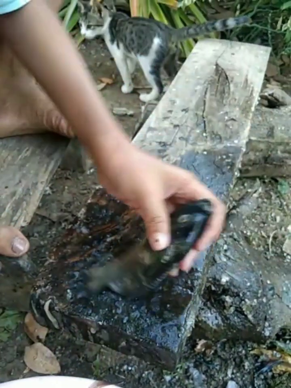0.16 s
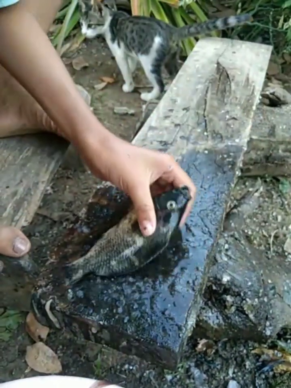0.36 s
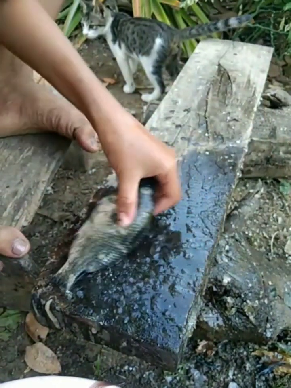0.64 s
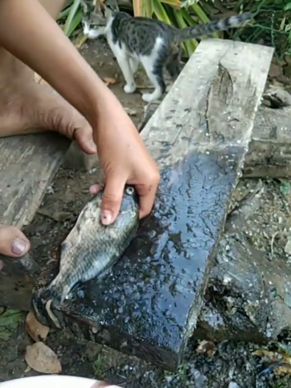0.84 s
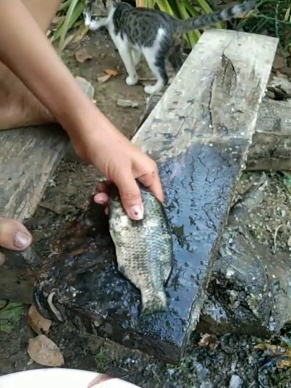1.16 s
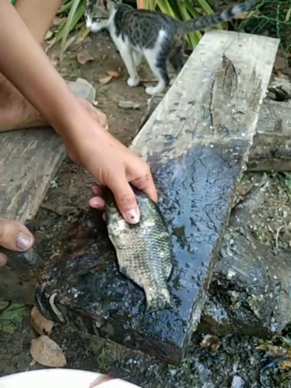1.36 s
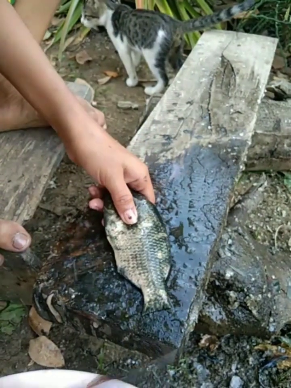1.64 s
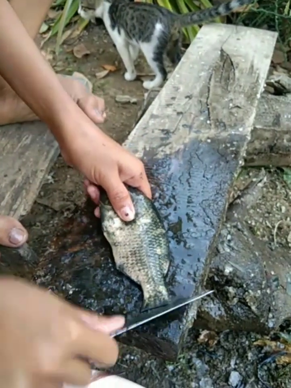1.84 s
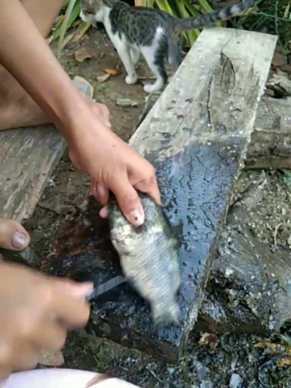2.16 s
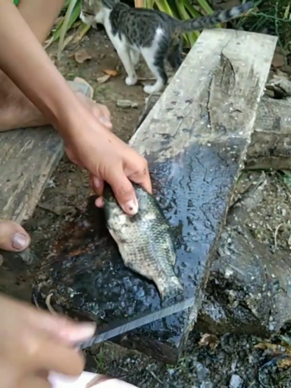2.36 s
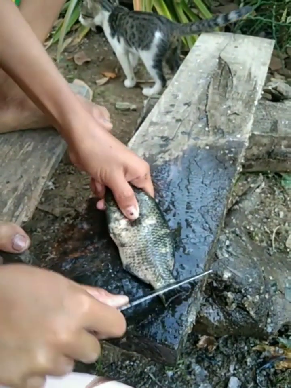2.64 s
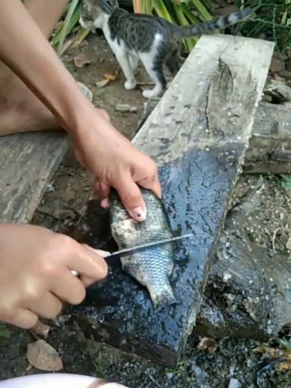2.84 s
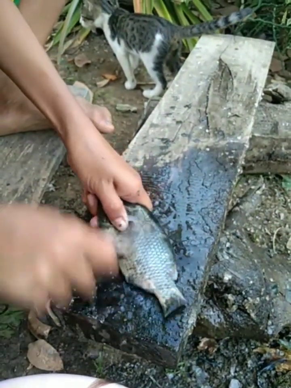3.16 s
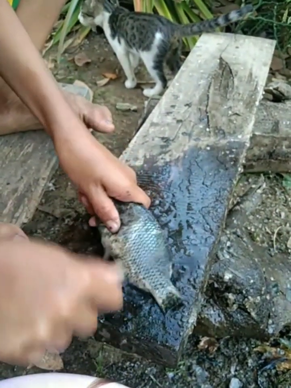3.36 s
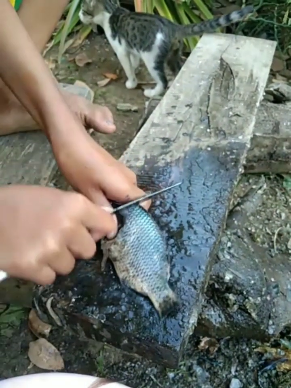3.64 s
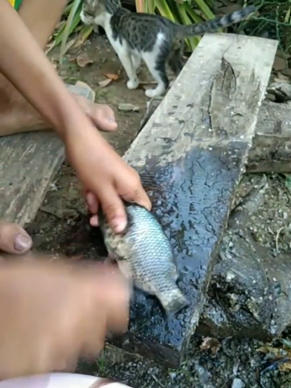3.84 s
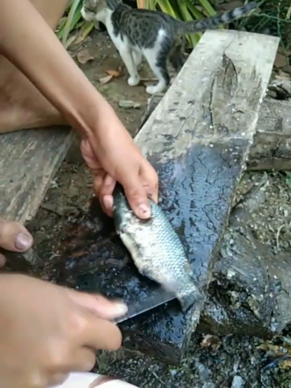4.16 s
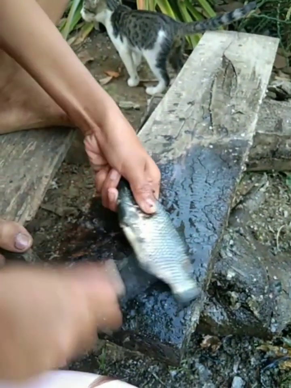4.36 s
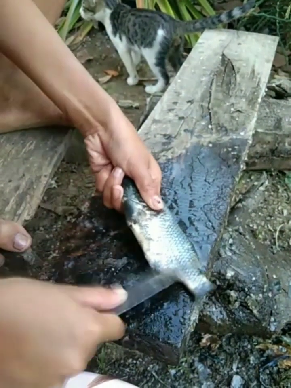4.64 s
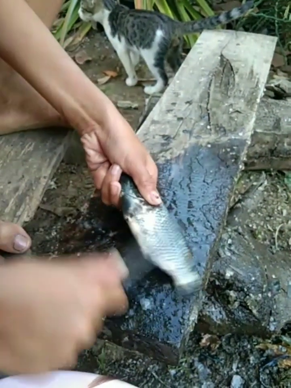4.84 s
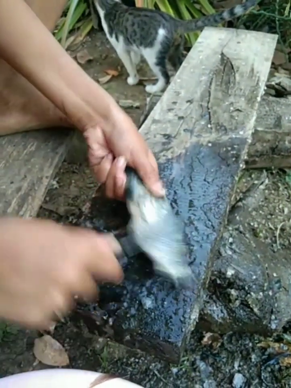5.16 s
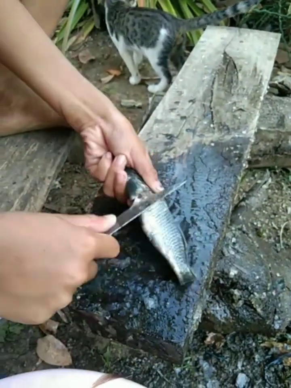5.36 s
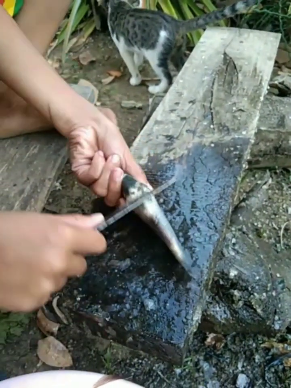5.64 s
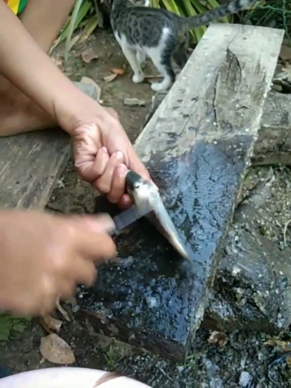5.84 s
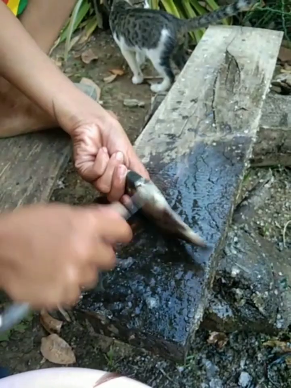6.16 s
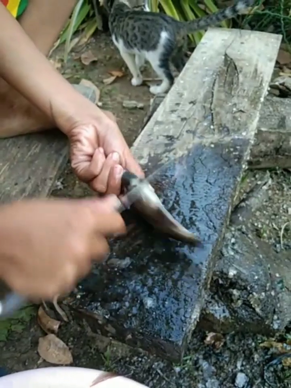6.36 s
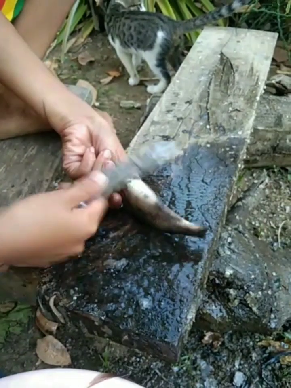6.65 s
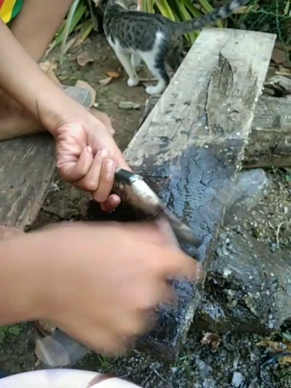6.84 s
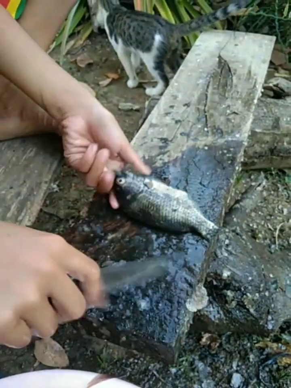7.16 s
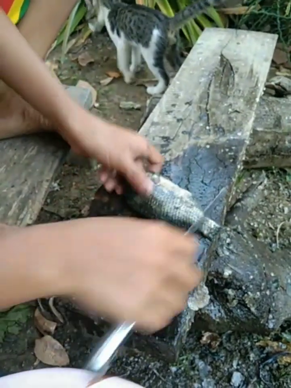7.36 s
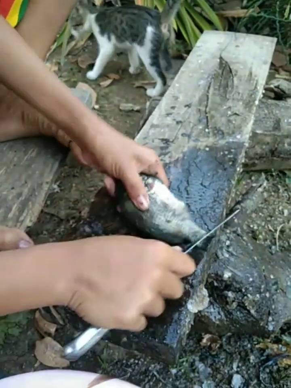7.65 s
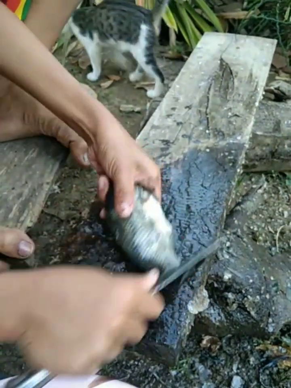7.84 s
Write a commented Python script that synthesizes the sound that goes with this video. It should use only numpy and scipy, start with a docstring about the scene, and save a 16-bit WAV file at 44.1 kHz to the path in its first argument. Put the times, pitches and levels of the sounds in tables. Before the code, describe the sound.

A fish slaps wetly on a soaked board outdoors, water gurgles out, then a blade rasps off scales in short strokes that turn faint.

```python
"""A fish flaps on a wet board outdoors: noise bursts ring air pockets, low sines thump, filtered clicks smear.
From about 1.3 s water gurgles out as short gliding sines, then from 2 s a blade rasps scales off in short
strokes of ringing clicks, firm at first and fainter after 5.5 s, with a wet splat near 7 s. A bird peeps
from 3 s, and hoarse chirrs follow. Throughout, narrow noise bands make the cicadas and a far motor's hum,
over a low rumble and a faint hiss that swells with the work; a thin wavering tone enters at 2.4 s."""
import sys
import numpy as np
from scipy import signal
from scipy.fft import rfft, irfft
from scipy.io import wavfile
from scipy.ndimage import uniform_filter1d, minimum_filter1d

SR = 44100
rng = np.random.default_rng(int(sys.argv[2]) if len(sys.argv) > 2 else 0)


def waveform_to_disk(signal):
    """Save audio, clipped to [-1, 1], as 16-bit WAV at the path in sys.argv[1]."""
    frames = np.transpose(np.atleast_2d(signal))
    scaled = np.clip(frames, -1, 1) * 32767
    samples = np.round(scaled).astype(np.int16)
    wavfile.write(sys.argv[1], SR, samples)


N = 352800
T = np.arange(N) / SR

# slaps, splats, droplets and blade catches; levels are the energy of each part before any echo:
# (time [s], air pocket [Hz], pocket [dB], splat centre [Hz], splat [dB], spray [dB],
#  60 dB decay [s], held to 0.003-0.09 when played)
CONTACTS = [(.0657, 530, -16.5, 3460, -12, -16, .057), (.0806, 1480, 10, 2080, 1, -3, 0.014),
            (.091, 580, -0.5, 6000, -30, -18, 0.0093), (.1276, 570, -19, 7800, -22, -19.5, 0.037),
            (.15, 796, -21.5, 3100, -30, -44, 0.031), (.1649, 580, -23, 2310, -47, -45, 0.012),
            (.1983, 570, -31, 3840, -19, -28, 0.0033), (.2488, 460, -18.5, 5550, -44, -42, 0.022),
            (.2703, 1580, -39, 5000, -19, -41, 0.019), (.2878, 810, -25, 5260, -24, -38, .033),
            (.314, 543, .5, 2590, -6, -14, 0.033), (.3739, 614, -21, 2840, -27, -45, 0.099),
            (.3966, 520, -26, 3300, -18.5, -26, 0.16), (.4262, 1530, -24, 4460, -14.5, -24, 0.1),
            (.4363, 1380, -22, 5680, -16.5, -31, 0.022), (.4449, 1240, -2, 2930, -7, -36, 0.017),
            (.457, 880, -19, 4730, -20.5, -23, .025), (.504, 1290, -51, 8100, -32, -28, 0.011),
            (.57, 556, -53, 7160, -32, -18, 0.009), (.6296, 720, 1, 2900, 2, -4.5, 0.017),
            (.664, 1540, -19, 1810, -40, -42, .12), (.6726, 820, 1, 1850, -43, -50, 0.019),
            (.7128, 860, 9.5, 2100, 7, 1.5, 0.046), (.7194, 790, 0.5, 7500, 4, -13, 0.015),
            (.73, 674, -3.5, 3000, -26, -28, 0.052), (.7701, 840, -33, 2400, -44, -41, .013),
            (.7863, 560, -2.5, 2500, -1, -11, 0.019), (.8063, 940, -11.5, 2240, -30, -26, 0.076),
            (.8184, 590, 8, 2540, 5, 3.5, 0.03), (.8313, 760, 5, 2830, -5, -18, 0.009),
            (.8855, 850, -21, 2310, -43, -41, 0.0092), (.9077, 610, -14.5, 2920, -17.5, -43, 0.032),
            (.9477, 1540, -9.5, 2770, -11.5, -21.5, 0.034), (1.014, 1000, -22, 2270, -27, -44, 0.11),
            (1.092, 840, -16, 5030, -45, -30, 0.036), (1.2701, 570, -23.5, 2840, -53, -42, 0.081),
            (1.3014, 1380, -15, 7800, -21, -20, 0.068), (1.3078, 760, -3.5, 7360, 7.5, -0.5, 0.007),
            (1.317, 800, -8, 2600, -1, -23, 0.014), (1.3223, 885, -20, 7650, -7, -5, .017),
            (1.328, 900, -37, 3100, -9.5, -11, 0.013), (1.361, 574, -19, 4800, -12, -16.5, 0.039),
            (1.3919, 720, -23, 4560, -20, -34, 0.081), (1.3992, 700, -9.5, 2120, -14, -35, 0.038),
            (1.4115, 955, -12, 4060, -13, -22, 0.066), (1.436, 940, -41, 3830, -16, -28, 0.0095),
            (1.4473, 1360, -10, 2370, -8.5, -41, 0.039), (1.4745, 360, -22, 2570, -8, -21, 0.064),
            (1.492, 420, -40, 4330, -18, -18, 0.011), (1.5192, 590, -32, 2230, -18, -14, 0.0066),
            (1.5538, 880, -17, 2650, -27, -41, 0.034), (1.5641, 1000, -12.5, 6700, -32, -25, 0.042),
            (1.593, 1500, -24, 2170, -20, -23, 0.018), (1.6069, 870, -18, 6500, -8.5, -33, 0.0092),
            (1.6148, 556, -35, 6440, -13, -34, .016), (1.6296, 330, -44, 3630, -17, -33, 0.09),
            (1.6524, 330, -48, 6200, -12.5, -32, 0.021), (1.6788, 1600, -30, 3700, -23, -44, 0.008),
            (1.687, 330, -48, 2800, -22, -24, 0.022), (1.7687, 413, -48, 4200, -17, -21.5, 0.031),
            (1.8306, 328, -51, 7950, -27, -43, 0.012), (1.9964, 400, -20, 5160, -20, -30, 0.031),
            (2.0085, 393, -12, 3080, -36, -26, 0.063), (2.0295, 413, -14, 3000, -19, -33, 0.14),
            (2.092, 328, -26, 5060, -13.5, -22, .061), (2.3925, 367, -44.5, 2960, -28.5, -45, 0.012),
            (2.77, 594, -39, 2750, -28.5, -43, 0.096), (2.8176, 391, -27, 4770, -18, -25, 0.014),
            (2.8279, 366, -37, 6400, -16.5, -14, .12), (2.8599, 330, -30, 5300, -8, -14, 0.11),
            (2.8763, 330, -37, 4500, -8.5, -11, 0.063), (2.9095, 970, -52, 8050, -33, -15.5, .008),
            (2.9526, 860, -55, 4700, -22, -33, 0.0095), (2.969, 734, -49, 4600, -16, -16, 0.084),
            (3.014, 1110, -19.5, 4950, -7, -16.5, 0.016), (3.2517, 1210, -24.5, 6030, -7, -6.5, 0.0079),
            (3.3092, 1530, -46, 4500, -23, -31, 0.011), (3.3393, 357, -37, 8100, -22.5, -19, 0.0061),
            (3.3936, 340, -52, 7040, -27.5, -31, 0.032), (3.5588, 1310, -26, 5400, -22, -24, 0.078),
            (3.5966, 830, -28.5, 4440, -12, -9, 0.042), (3.9672, 626, -23, 7140, -26, -25.5, .017),
            (4.0382, 560, -24.5, 8300, -13.5, -16, 0.12), (4.0873, 337, -25.5, 6400, -28, -19, 0.069),
            (4.114, 397, -28.5, 4900, -14, -13, 0.019), (4.205, 600, -48, 5940, -33, -32, 0.02),
            (4.2972, 440, -43, 7360, -20, -31, .058), (4.315, 1420, -26, 5540, -15.5, -28, 0.27),
            (4.3672, 546, -31.5, 8160, -14, -23, .014), (4.4592, 730, -29, 2270, -40, -37, 0.038),
            (4.502, 600, -48, 6400, -26, -37, .015), (4.5471, 480, -28, 7140, -41, -9.5, 0.0022),
            (4.5571, 1220, -23.5, 7600, -20, -15.5, 0.029), (4.7666, 1260, -29, 2860, -29.5, -41, 0.11),
            (5.0477, 580, -23.5, 4570, -14, -26, .012), (5.1839, 637, -43, 4500, -28.5, -34, 0.02),
            (5.2341, 1280, -23.5, 3660, -15, -17, 0.022), (5.2844, 1537, -21, 1943, -21.5, -33, 0.035),
            (5.7023, 1210, -42.5, 7900, -24, -29.5, .011), (5.9526, 1236, -33.5, 7940, -20.5, -32.5, 0.039),
            (6.1595, 1430, -31.5, 7520, -26, -23.5, 0.058), (6.703, 616, -35.5, 6150, -29.5, -25, .016),
            (6.913, 540, -42, 7330, -34, -49, 0.021), (6.9709, 530, -18, 3000, -17.5, -20.5, .019),
            (7.0387, 1100, 0, 3840, 8.5, 3.5, 0.022), (7.045, 800, -11, 3830, -9, -1, 0.0096),
            (7.049, 900, -11, 4670, 1.5, -18, 0.0077), (7.0672, 330, -23, 4900, -18, -47, 0.011),
            (7.2173, 1010, -23, 2270, -30, -42, 0.029), (7.2238, 1060, -18, 2140, -22, -26, .11),
            (7.23, 1100, -24, 2600, -19.5, -39, 0.032), (7.254, 914, -33.5, 3430, -42, -28.5, 0.027),
            (7.715, 1216, -34.5, 4500, -28.5, -64, .06)]
# board thumping on the ground: (time [s], first pitch [Hz], settled pitch [Hz], level [dB], 60 dB decay [s])
BOARD_THUMPS = [(0.079, 151, 64, -24.5, 0.19), (0.244, 212, 174, -38.5, 0.061),
                (0.312, 149, 100, -47, 0.051), (0.634, 221, 170, -38.5, 0.072),
                (0.717, 197, 121, -24, 0.045), (0.784, 228, 180, -31, .05), (0.817, 296, 236, -20.5, 0.03),
                (0.916, 90, 64.6, -45, 0.41), (0.948, 175, 70, -35.5, 0.061), (2.071, 89, 70, -52, 0.12),
                (7.041, 120, 70.5, -55, 0.53)]
# wet skin sliding on the board: (time [s], level [dB])
SKIN_SLIDING = [(0, -73.5), (.12, -56), (0.281, -63), (.43, -65), (.55, -65.5), (.7, -62.5), (.9, -57.5),
                (1.0, -61.5), (1.1, -58), (1.15, -94), (1.25, -106), (1.36, -48.5), (1.62, -73), (1.8, -74),
                (1.95, -64)]
# water bubbles squeezed out, most of them rising in pitch; level before the fade:
# (time [s], length [s], first pitch [Hz], last pitch [Hz], level [dB])
WATER_BUBBLES = [(1.361, 0.0041, 4950, 5060, -26), (1.368, 0.016, 2250, 2480, -38),
                 (1.379, 0.0068, 2800, 3120, -34), (1.391, 0.0045, 4840, 4800, -28.5),
                 (1.411, 0.0083, 890, 1010, -25), (1.418, 0.004, 4350, 4200, -20),
                 (1.436, 0.0042, 4050, 3820, -33), (1.447, 0.0046, 2500, 2600, -24.5),
                 (1.47, 0.061, 314.5, 660, -38.5), (1.504, 0.014, 540, 640, -34),
                 (1.521, 0.01, 590, 624, -34), (1.476, 0.01, 2810, 3000, -26.5),
                 (1.476, 0.0037, 4970, 4930, -27), (1.492, .006, 4090, 4370, -44),
                 (1.52, 0.0081, 2160, 2380, -35), (1.555, 0.019, 2560, 3320, -42.5),
                 (1.568, 0.014, 3220, 5530, -44), (1.564, 0.022, 987, 1440, -26.5),
                 (1.563, 0.0043, 5730, 6100, -33), (1.566, .014, 6670, 7850, -41),
                 (1.592, 0.011, 1400, 1600, -38), (1.594, 0.0071, 1680, 2600, -51),
                 (1.606, 0.0099, 2010, 2450, -40), (1.618, 0.008, 3520, 3470, -36),
                 (1.631, 0.0066, 3600, 3550, -46), (1.688, 0.023, 2930, 3040, -46),
                 (1.711, 0.0077, 2980, 6160, -45), (1.747, 0.0071, 5030, 4940, -44),
                 (1.767, 0.017, 3430, 4900, -28.5)]
# blade strokes: (time [s], length [s], rasp at start [dB], rasp at end [dB], board at start [dB],
#  top at end [dB], hollow note at start [dB])
BLADE_STROKES = [(2.009, 0.11, -37, -41.5, -63, -56, -31), (2.155, 0.17, -62, -80, -67, -94, -85),
                 (2.26, 0.067, -54.5, -40, -60, -49, -60), (2.84, 0.071, -30.5, -41.5, -53, -52, -40.5),
                 (2.959, 0.065, -38, -41, -67, -51, -80), (3.092, 0.057, -58, -53, -79, -69, -85),
                 (3.22, 0.078, -40, -32.5, -50, -40, -48), (3.336, 0.04, -68, -55, -75, -74, -80),
                 (3.539, 0.071, -42.5, -39.5, -58, -41, -66), (3.965, 0.024, -54, -52, -61, -75, -46.5),
                 (4.033, 0.082, -36, -37, -50, -44, -45), (4.307, 0.058, -38, -38.5, -53, -55, -51),
                 (4.545, 0.056, -34, -45, -51.5, -51, -55), (4.786, 0.047, -41, -41, -51.5, -48.5, -86),
                 (5.001, 0.047, -42.5, -40, -47, -63, -90), (5.238, 0.011, -43, -42, -45, -77, -70),
                 (5.286, 0.026, -36, -53, -55, -53, -49), (5.697, 0.057, -65, -70, -79, -66, -79),
                 (5.935, 0.057, -59.5, -55.5, -67.5, -60.5, -83), (6.159, 0.044, -65, -62, -69, -66, -71),
                 (6.223, 0.11, -76, -72, -93, -95, -83), (6.35, 0.035, -56, -49, -62, -59, -78),
                 (6.412, 0.12, -66, -67, -90, -99, -76), (6.623, 0.42, -71.5, -58.5, -81, -106, -91),
                 (7.12, 0.11, -70, -61, -65, -71, -71), (6.554, 0.053, -55, -50, -64, -58, -81),
                 (7.06, 0.12, -58, -66, -76, -70, -52), (7.23, 0.027, -58, -54, -50, -76, -70),
                 (7.712, 0.052, -71, -68, -83, -91, -88)]
# main colour of the rasp: (frequency [Hz], relative level [dB per Hz])
RASP_COLOUR = [(760, -51.5), (1300, -7), (1920, -3), (2390, -16), (2960, -3), (3250, -5), (4610, -2),
               (8180, -2.5), (9500, -19), (12400, -28.5), (20900, -120)]
# bright top of the rasp: (frequency [Hz], relative level [dB per Hz])
TOP_COLOUR = [(8600, -30), (9600, 0), (11500, -5), (13500, -8), (16000, -11)]
# board resonances: (centre [Hz], width [Hz], relative level [dB])
BOARD_MODES = [(520, 90, 1), (864, 120, 0), (1000, 40, -11.5), (1233, 26, 8)]
# reflections from ground and logs nearby: (delay [s], level [dB])
NEARBY_ECHOES = [(.0021, -18), (.0047, -24), (.011, -26)]
# bird peeps, level before fade and flutter:
# (time [s], length [s], first pitch [Hz], last pitch [Hz], level [dB])
BIRD_PEEPS = [(2.98, 0.036, 2700, 2860, -51.5), (3.195, 0.04, 2640, 2790, -48.5),
              (3.425, 0.049, 2710, 2780, -46.5), (3.665, 0.036, 2750, 2790, -46),
              (3.7, 0.02, 2820, 2820, -56), (3.93, 0.03, 2680, 2560, -52.5)]
# faint hoarse chirrs, perhaps the bird's, level before fade and roughness:
# (time [s], length [s], first pitch [Hz], last pitch [Hz], level [dB])
HOARSE_CHIRRS = [(3.48, 0.067, 3000, 2130, -54.5), (3.71, 0.07, 3000, 2500, -54),
                 (3.76, 0.11, 2530, 2210, -61), (3.8, 0.055, 2980, 2960, -62),
                 (6.16, 0.05, 4180, 4250, -54), (6.285, 0.11, 4020, 4260, -55.5),
                 (6.55, 0.046, 4100, 4030, -50.5)]
# far motor's hum: (time [s], level [dB])
MOTOR_LEVEL = [(0, -66.5), (3, -63), (6, -61), (8, -57)]
# colour of the low rumble: (frequency [Hz], relative level [dB per Hz])
RUMBLE_COLOUR = [(12, -40.5), (20, -41), (53, -10.5), (101, -2), (129, 0), (238, -10), (451, -13.5),
                 (600, -67), (780, -54.5), (1320, -120)]
# hiss, one row each for middle, treble and top: (level in a pause [dB], level during full work [dB])
HISS_LEVELS = [(-68, -65.5), (-81, -69), (-99, -83)]
# colours of the three hiss layers: (frequency [Hz], relative level [dB per Hz])
HISS_MIDDLE = [(430, 0), (620, -4), (850, 0), (1800, -4), (3500, -8)]
HISS_TREBLE = [(3500, 0), (5500, -1.5), (8300, -1.5)]
HISS_TOP = [(9200, -1.5), (11500, -5), (15800, -8)]

GURGLE_S = (1.34, 1.8)  # contacts in this span are droplets, with less broad splash
CATCH_DB, CATCH_SPREAD_DB = 15.5, 6.5  # energy of chance blade catches above the rasp level
DROPLET_DB, DROPLET_SPREAD_DB = 27.5, 1  # energy of chance droplets above the sliding level
SLIDING_LOW_DB, SLIDING_TOP_DB, SLIDING_HOLLOW_DB = -2, -13.5, -8.5  # against the sliding level
BITE_DB_PER_S, LIFT_DB_PER_S = 1502.5, 1118  # how fast a stroke sets in and dies
BOARD_RISE_DB, TOP_RISE_DB, HOLLOW_FADE_DB = 1.5, 19.5, 16.5  # change over a stroke
RUSTLE_DB, RUSTLE_FADE_DB_PER_S = -20, 150  # loose scales rustle on after the lift
LIGHT_DB, FIRM_DB, LIGHT_BED, FIRM_BED = -62, -50, 3.0, .55  # light strokes rub, firm ones tear
SCALE_HZ, SCALE_CYCLES, SCALE_SHARE = (1940, 7870), 7.5, 0.31  # pitch range, sharpness, ringing share
HOLLOW_HZ, HOLLOW_WIDTH_HZ = 350, 30
CICADA_HZ, CICADA_WIDTH_HZ, CICADA_DB = 8670, 640, -64
MOTOR_HZ, MOTOR_WIDTH_HZ = 125, 12
WHINE_S, WHINE_HZ, WHINE_DB, WHINE_WAVER = (2.4, 5.8), 230, -67.5, .025  # peak dB before it flickers
RUMBLE_DB = -60
WORK_DB, WORK_RANGE_DB = -60, 17  # loudness that starts to lift the hiss; span up to full lift
HOLD_S, SINK_DB_PER_S = 0.063, 130  # how long that loudness stays, how fast it sinks
CUTOFF_HZ = 16700


def hits(rows, pocket_cycles, splat_cycles, crack_s):
    """Each contact cracks, rings a trapped pocket of air, and throws a splat and a spray that die fast."""
    out, t = np.zeros(N + 4096), np.arange(4096) / SR
    noises = rng.standard_normal((len(rows), 3, 4096))
    for (s, pocket_hz, pocket_db, splat_hz, splat_db, spray_db, t60), noise in zip(rows, noises):
        dying = np.minimum(t / 0.00049, 1) * amp(-60 * t / np.clip(t60, .003, .09))
        crack = dying * (1 + 0.28 * np.exp(-t / crack_s))
        trickle = 0.087 * dying ** 0.22  # faint water after the crack
        thud, wet, fine = noise * (crack + trickle)
        pocket = .4 * band(thud, 250, 1600) + resonate(thud, pocket_hz, pocket_hz / pocket_cycles)
        splash = .08 if GURGLE_S[0] < s < GURGLE_S[1] else .25
        splat = splash * band(wet, 2400, 4500) + resonate(wet, splat_hz, splat_hz / splat_cycles)
        spray = band(fine, 6000, 9200, order=3) + .09 * band(fine, 9000, 14000)
        at = round(s * SR)
        for part, level_db in ((pocket, pocket_db), (splat, splat_db), (spray, spray_db)):
            out[at:at + 4096] += amp(level_db) * part / np.linalg.norm(part)
    return out[:N]


def small_contacts(count):
    """Chance contact rows: two blade catches a stroke, and count droplets while the fish slides."""
    s, length, first_db, last_db = np.repeat(BLADE_STROKES, 2, axis=0).T[:4]
    slid_s, slid_db = np.transpose(SKIN_SLIDING)
    catches = len(s)
    draw = rng.random((catches + count, 4))
    odds = rng.standard_normal((catches + count, 3))
    u = draw[:catches, 0]
    drops = slid_s[-1] * draw[catches:, 0]
    catch_db = first_db + (last_db - first_db) * u + CATCH_DB
    drop_db = np.interp(drops, slid_s, slid_db) + DROPLET_DB
    spread_db = np.r_[np.full(catches, CATCH_SPREAD_DB), np.full(count, DROPLET_SPREAD_DB)]
    # pocket and spray tend to sit below the splat
    parts_db = np.r_[catch_db, drop_db] + spread_db * odds.T + [[-12], [0], [-7]]
    pocket_db, splat_db, spray_db = parts_db
    times = np.r_[s + length * u, drops]
    pocket_hz, splat_hz = 350 * 4.0 ** draw[:, 1], 2400 * 3.6 ** draw[:, 2]
    t60 = 0.02 * 4.5 ** draw[:, 3]
    return np.transpose([times, pocket_hz, pocket_db, splat_hz, splat_db, spray_db, t60])


def thumps(settle_s):
    """Low damped sines whose pitch drops as the board comes to rest."""
    out, t = np.zeros(N), np.arange(SR // 2) / SR
    for s, first_hz, last_hz, level_db, t60 in BOARD_THUMPS:
        hz = last_hz + (first_hz - last_hz) * np.exp(-t / settle_s)
        at = round(s * SR)
        out[at:at + len(t)] += amp(level_db - 60 * t / t60) * np.sin(2 * np.pi * np.cumsum(hz) / SR)
    return out


def strokes():
    """Gains of rasp, board, top and hollow note: each stroke bites, runs its length and lifts."""
    out = np.zeros((4, N))
    for s, length, first_db, last_db, board_db, top_db, hollow_db in BLADE_STROKES:
        near = slice(round((s - .05) * SR), round((s + length + .25) * SR))
        t = T[near] - s
        u = np.clip(t / length, 0, 1)
        after = np.maximum(t - length, 0)
        bite_db = BITE_DB_PER_S * np.minimum(t, 0)
        rustle_db = RUSTLE_DB - RUSTLE_FADE_DB_PER_S * after
        lift_db = np.maximum(-LIFT_DB_PER_S * after, rustle_db)
        levels_db = np.array([first_db + (last_db - first_db) * u,
                              board_db + BOARD_RISE_DB * u,
                              top_db - TOP_RISE_DB * (1 - u),
                              hollow_db - HOLLOW_FADE_DB * u])
        out[:, near] += amp(bite_db + lift_db + levels_db)
    return out


def rubbing(levels, clicks):
    """Clicks of scraping or sliding: bright at the contact, dull through the resonant board."""
    rasp, low, top, hollow = levels
    board = 0
    for k, (hz, width_hz, level_db) in enumerate(BOARD_MODES):
        board = board + (-1) ** k * amp(level_db) * resonate(clicks, hz, width_hz)
    note = resonate(clicks, HOLLOW_HZ, HOLLOW_WIDTH_HZ)
    ringing = rms_one(scales(clicks, count=16))
    bright = shaped((1 - SCALE_SHARE) * rms_one(clicks) + SCALE_SHARE * ringing, RASP_COLOUR)
    return rasp * bright + low * rms_one(board) + top * shaped(clicks, TOP_COLOUR) + hollow * rms_one(note)


def scales(clicks, count):
    """Every few milliseconds the clicks go to another of count short rings, as scales differ in pitch."""
    dealt = np.repeat(rng.integers(0, count, N // 100 + 1), 100)[:N]
    out = 0
    for k, hz in enumerate(np.geomspace(*SCALE_HZ, count)):
        out = out + resonate(clicks * (dealt == k) + 1e-18, hz, hz / SCALE_CYCLES)
    return out


def grains(per_s, spread_db, bed):
    """Random clicks of uneven size and wavering density, each a short dying fizz, on a noise bed."""
    sizes = amp(spread_db * np.minimum(rng.exponential(1, N), 3.0))
    born = sizes * (rng.random(N) < per_s * amp(2.0 * drift(60)) / SR)
    fizz = signal.lfilter([1], [1, -.85], born)
    return (fizz + bed) * rng.standard_normal(N)


def glides(rows, rise, fall):
    """Bubbles or bird calls: sines that slide in pitch, rise over a set share of their length, then fade."""
    out = np.zeros(N)
    for s, length, first_hz, last_hz, level_db in rows:
        u = np.arange(round(length * SR)) / (length * SR)
        phase = 2 * np.pi * np.cumsum(first_hz * (last_hz / first_hz) ** u) / SR
        envelope = np.minimum(u / rise, 1) * (1 - u) ** fall
        at = round(s * SR)
        out[at:at + len(u)] += amp(level_db) * envelope * np.sin(phase)
    return out


def outdoors(x):
    """Ground and logs nearby throw back a few dull echoes."""
    back, dull = np.zeros(N), band(x, 200, 4900, order=1)
    for s, level_db in NEARBY_ECHOES:
        lag = round(s * SR)
        back[lag:] += amp(level_db) * dull[:N - lag]
    return x + back


def bird():
    """Gliding peeps flutter in level; fast random modulation makes the chirrs hoarse."""
    peeps = glides(BIRD_PEEPS, rise=.4, fall=.4) * amp(2.0 * drift(40))
    return peeps + glides(HOARSE_CHIRRS, rise=.3, fall=.5) * drift(260)


def cicadas():
    """Many singers blur into one narrow noise band that sways slowly in level."""
    half_hz = CICADA_WIDTH_HZ / 2
    chorus = band(rng.standard_normal(N), CICADA_HZ - half_hz, CICADA_HZ + half_hz, order=5)
    return amp(CICADA_DB + 1.5 * drift(4)) * rms_one(chorus)


def motor():
    """Noise through two resonances at one pitch hums unsteadily."""
    narrow = resonate(rng.standard_normal(N), MOTOR_HZ, MOTOR_WIDTH_HZ)
    return level_curve(MOTOR_LEVEL) * rms_one(resonate(narrow, MOTOR_HZ, 3 * MOTOR_WIDTH_HZ))


def whine():
    """A thin low sine wavers in pitch and flickers in level."""
    tone = np.sin(2 * np.pi * np.cumsum(WHINE_HZ * (1 + WHINE_WAVER * drift(2.95))) / SR)
    return tone * level_curve([(s, WHINE_DB) for s in WHINE_S]) * amp(5.5 * drift(45))


def rumble():
    """Patchy low noise."""
    return amp(RUMBLE_DB) * coloured(RUMBLE_COLOUR, patchy_db=4.0, rate=2.1)


def hiss(work):
    """Three flickering noise layers swell with the work, with stray droplets and flakes ticking."""
    middle, treble, top = (amp(rest_db + (work_db - rest_db) * work) for rest_db, work_db in HISS_LEVELS)
    out = middle * coloured(HISS_MIDDLE, patchy_db=5, rate=7, count=7)
    out += treble * coloured(HISS_TREBLE, patchy_db=5, rate=7, count=12)
    out += treble * band(grains(per_s=8.3, spread_db=4.0, bed=0), 2500, 9800, order=1)
    return out + top * coloured(HISS_TOP, patchy_db=6.0, rate=12)


def busy(near):
    """0 in a pause, 1 during full work: loudness of the near sounds, held a moment, then sinking."""
    level_db = 10 * np.log10(uniform_filter1d(near ** 2, size=400) + 1e-12)
    half = round(HOLD_S * SR / 2)
    # the delay by half a window makes the hold look back only
    delayed_db = np.r_[np.full(half, -120.), level_db]
    # a running maximum, as the minimum of the negative
    peak_db = -minimum_filter1d(-delayed_db, size=2 * half + 1)[:N]
    held_db = np.maximum.accumulate(peak_db + SINK_DB_PER_S * T) - SINK_DB_PER_S * T
    return uniform_filter1d(np.clip((held_db - WORK_DB) / WORK_RANGE_DB, 0, 1), size=900)


def amp(db):
    """Decibels to gain."""
    return 10 ** (np.asarray(db) / 20)


def rms_one(x):
    """Scale to unit rms."""
    return x / np.sqrt(np.mean(x ** 2) + 1e-20)


def level_curve(rows):
    """Gain along (time, level) rows, silent outside them."""
    s, level_db = np.transpose(rows)
    fade = np.clip(np.minimum(T - s[0], s[-1] - T) / .008, 0, 1)
    return fade * amp(np.interp(T, s, level_db))


def band(x, low_hz, high_hz, order=2):
    """Butterworth band-pass."""
    return signal.sosfilt(signal.butter(order, [low_hz, high_hz], "band", fs=SR, output="sos"), x)


def resonate(x, hz, width_hz):
    """Two-pole resonance with gain 1 on top."""
    r = np.exp(-np.pi * width_hz / SR)
    gain = (1 - r * r) / 2
    return signal.lfilter([gain, 0, -gain], [1, -2 * r * np.cos(2 * np.pi * hz / SR), r * r], x)


def drift(rate):
    """Random wander of spread 1: noise smoothed by two poles at rate [Hz]."""
    r = np.exp(-80 * np.pi * rate / SR)  # runs at SR / 40
    slow = signal.lfilter([1], [1, -2 * r, r * r], rng.standard_normal(N // 40 + 2002))[2000:]
    return np.interp(np.arange(N) / 40, np.arange(len(slow)), rms_one(slow))


def coloured(spectrum, patchy_db, rate, count=3):
    """Noise in count bands an octave, each flickering on its own, dips deeper than swells; rms 1."""
    noise = rng.standard_normal((2, N))  # neighbouring bands take different noise
    hz, level_db = np.transpose(spectrum)
    edges = np.geomspace(hz[0], hz[-1], int(count * np.log2(hz[-1] / hz[0])) + 1)
    out = 0
    for k, (low, high) in enumerate(zip(edges, edges[1:])):
        centre_db = np.interp(np.log(low * high) / 2, np.log(hz), level_db)
        flicker_db = patchy_db * np.minimum(drift(rate), 1)
        out = out + amp(centre_db + flicker_db) * band(noise[k % 2], low, high)
    return rms_one(out)


def shaped(x, spectrum):
    """Give a signal a smooth spectrum; rms 1."""
    hz, level_db = np.transpose(spectrum)
    bins = np.arange(1, N // 2 + 2) * SR / N
    return rms_one(irfft(rfft(x) * amp(np.interp(np.log(bins), np.log(hz), level_db)), N))


def scene():
    """Near work with its echoes, over the bird and the yard."""
    contacts = np.r_[CONTACTS, small_contacts(count=22)]
    near = hits(contacts, pocket_cycles=4.0, splat_cycles=7.0, crack_s=.0006)
    near += thumps(settle_s=.012)
    blade = strokes()
    bed = np.interp(blade[0], amp([LIGHT_DB, FIRM_DB]), [LIGHT_BED, FIRM_BED])
    near += rubbing(blade, grains(per_s=1200, spread_db=5.2, bed=bed))
    balance = amp([[0], [SLIDING_LOW_DB], [SLIDING_TOP_DB], [SLIDING_HOLLOW_DB]])
    sliding = level_curve(SKIN_SLIDING) * balance
    near += rubbing(sliding, grains(per_s=700, spread_db=8.0, bed=0.23))
    near += glides(WATER_BUBBLES, rise=0.05, fall=0.66)
    yard = cicadas() + motor() + whine() + rumble() + hiss(busy(near))
    return (outdoors(near) + bird() + yard)[None]


def record(dry):
    """The lowest bass and the top are cut."""
    bass_cut = signal.sosfilt(signal.butter(2, 45, "high", fs=SR, output="sos"), dry)
    return signal.sosfilt(signal.cheby2(12, 70, CUTOFF_HZ, fs=SR, output="sos"), bass_cut)


dry = scene()
out = record(dry)
waveform_to_disk(out)
```